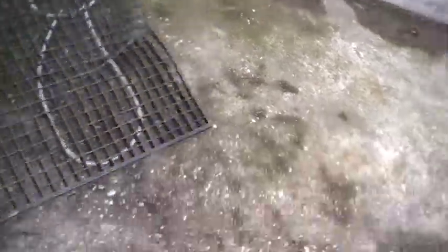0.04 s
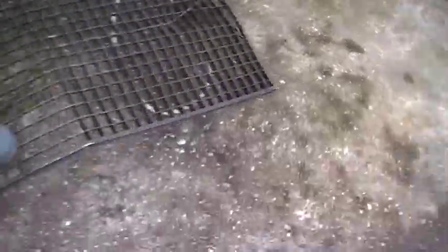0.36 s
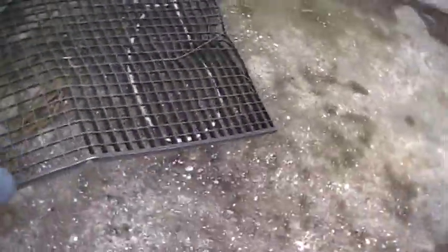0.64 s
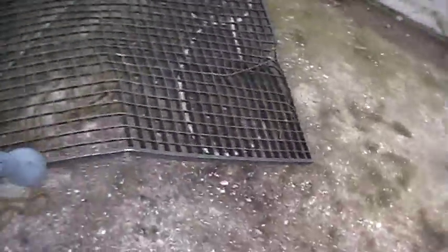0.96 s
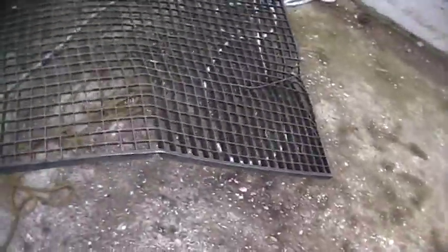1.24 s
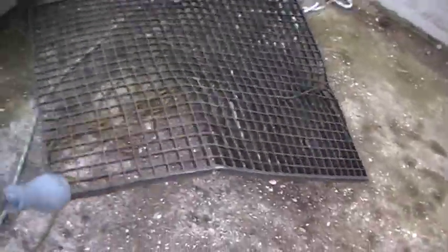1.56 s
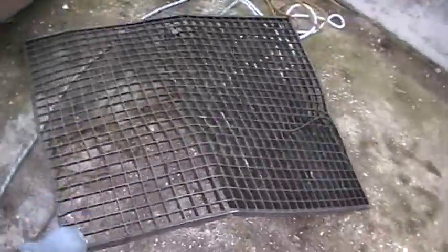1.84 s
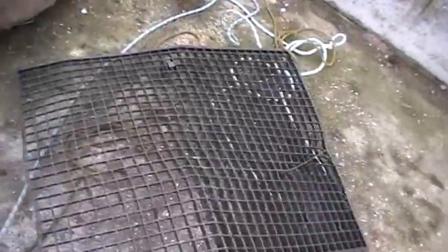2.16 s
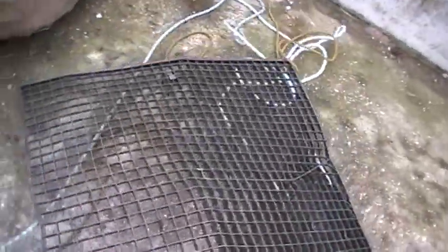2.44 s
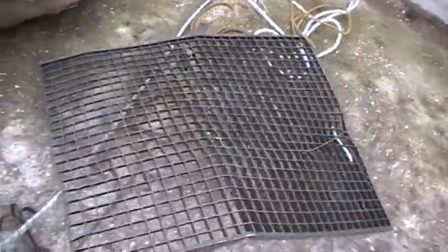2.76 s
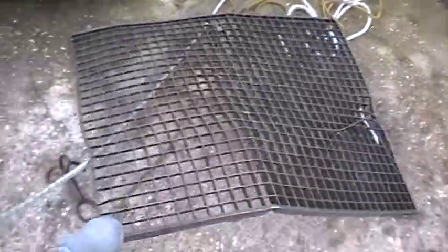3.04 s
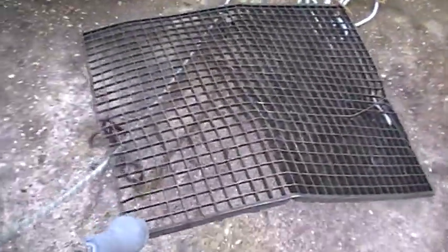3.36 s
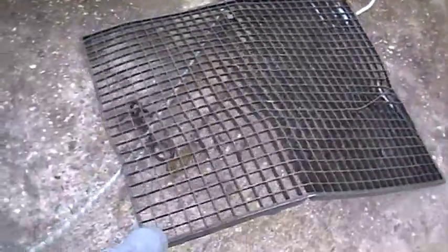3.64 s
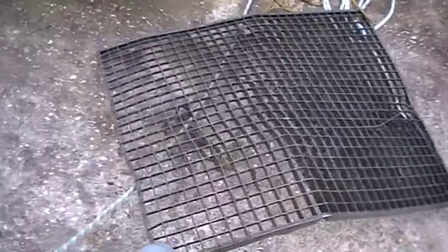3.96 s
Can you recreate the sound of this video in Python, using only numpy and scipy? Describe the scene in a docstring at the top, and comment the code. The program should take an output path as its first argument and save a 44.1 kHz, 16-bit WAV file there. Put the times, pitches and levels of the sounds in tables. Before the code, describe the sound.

A steel grid and chain scrape over rough concrete outdoors. After a brief jingle, the first gritty pull starts around 0.4 seconds, rings a bar at 1.2 and stops with a dull microphone thump at 1.4. A second pull runs from 1.6 to 4 seconds, the links clattering more densely from 2.8, with sharp clicks and small pings. Wind gusts rumble on the microphone, strongest between 0.5 and 2 seconds.

```python
"""A steel grid and a chain with hooks are dragged over rough concrete outdoors, in two pulls.
Grit crunches under the sliding steel and plucks the mesh; links jingle, catch and clatter in short runs.
Now and then a struck hook, bar or wire rings, the rim knocks, or the bent grid sticks, slips and groans.
Behind it lies a faint bed of air; gusts buffet the microphone, and one dull thump hits it."""
import sys
import numpy as np
from scipy import signal
from scipy.fft import rfft, irfft
from scipy.io import wavfile
from scipy.ndimage import uniform_filter1d

SR = 44100
rng = np.random.default_rng(int(sys.argv[2]) if len(sys.argv) > 2 else 0)


def dump(signal):
    """Clip the signal to [-1, 1] and save it as 16-bit WAV at the path in sys.argv[1]."""
    limited = np.clip(np.atleast_2d(signal).T, -1, 1)
    pcm = np.round(limited * 32767).astype(np.int16)
    wavfile.write(sys.argv[1], SR, pcm)


N = 176400

# Table levels are relative: each layer sets its own gain on top.
# EQ of the still air: (frequency [Hz], level [dB])
AIR_EQ = [(28, 6), (140, -2.5), (620, -7), (2100, -25), (10500, -19), (15500, -20)]
# EQ of the wind's low body: (frequency [Hz], level [dB])
RUMBLE_EQ = [(22, -48), (42, -4), (72, -5.5), (115, 1.5), (205, .5), (310, -7.5), (510, -20.5), (950, -24),
             (2900, -68)]
# EQ of the rasp in strong gusts: (frequency [Hz], level [dB])
RASP_EQ = [(40, -32), (190, -6), (320, 2.5), (470, 0), (760, -11), (1350, -22), (2450, -36), (6100, -82)]
# gust envelope: (time [s], level [dB])
GUSTS = [(0.0, -54), (0.11, -55), (0.22, -33.5), (0.41, -35.5), (0.43, -57), (0.5, -23.5), (0.58, -35),
         (0.63, -26.5), (0.71, -20.5), (0.92, -46), (0.97, -17), (1.02, -24), (1.06, -17), (1.1, -20.5),
         (1.15, -31), (1.24, -20.5), (1.28, -31.5), (1.37, -24.5), (1.4, -30.5), (1.44, -21), (1.48, -27.5),
         (1.56, -39.5), (1.64, -23), (1.68, -38), (1.7, -24.5), (1.77, -17), (1.82, -25.5), (1.84, -16.5),
         (1.94, -47.5), (2.08, -33.5), (2.12, -20), (2.16, -33.5), (2.41, -43.5), (2.43, -31.5),
         (2.47, -41.5), (2.65, -28), (3.04, -31), (3.11, -40.5), (3.15, -28), (3.19, -37), (3.3, -36.5),
         (3.32, -27.5), (3.45, -33.5), (3.51, -27.5), (3.62, -60), (3.65, -30.5), (3.73, -30), (3.77, -24),
         (3.83, -42.5), (3.89, -40), (3.92, -37), (3.97, -27.5), (4.0, -42)]
# short dull buffets on the microphone: (time [s], level [dB])
WIND_BUFFETS = [(0.334, -30), (0.615, -15.5), (0.753, -14), (0.816, -20.5), (1.052, -7.5), (1.071, -6),
                (1.84, -29), (2.655, -15), (2.692, -25), (2.755, -17), (2.798, -20), (2.844, -18),
                (2.887, -14), (3.019, -18), (3.146, -13.5), (3.327, -11.5), (3.507, -18), (3.654, -14),
                (3.923, -18.5)]

# blows on a hook: (time [s], level [dB])
HOOK_STRIKES = [(0.285, -33), (0.43, -21), (2.147, -29), (2.622, -24.5)]
# the hook's bright ring: (frequency [Hz], level [dB], t60 [s])
HOOK_MODES = [(7375, -3, 0.11), (9383, -12, 0.19), (9900, -12, .08), (10870, -14, 0.15), (12220, -6, 0.074),
              (13500, -9, 0.095)]
# blows on a bar of the grid: (time [s], level [dB])
BAR_STRIKES = [(1.2278, -26), (1.34, -40)]
# the bar's ring: (frequency [Hz], level [dB], t60 [s])
BAR_MODES = [(3060, -11.5, 0.5), (4730, -3.5, 0.45), (4640, 9, 0.029), (5440, 14, .028), (5920, 9, 0.032),
             (5940, -13, 0.34), (9369, 0, 0.18), (10400, -2, 0.12), (11030, 10.5, 0.045), (12200, -2.5, .1),
             (13528, -8.5, .11)]
# the grid's rim hits the concrete: (time [s], level [dB])
RIM_KNOCKS = [(0.412, -17.5), (2.323, -25), (2.803, -32)]
# the rim's short clank: (frequency [Hz], level [dB], t60 [s])
RIM_MODES = [(1500, -20, 0.035), (2060, -15, 0.034), (3030, 0, 0.021)]
# a wire slips: (time [s], level [dB])
CREAK_SLIPS = [(0.7, -20.5)]
# its short chirp: (frequency [Hz], level [dB], t60 [s])
CREAK_MODES = [(1070, 1, 0.023), (1360, -4.5, 0.022), (1780, -15, .022)]
# wires catch and sing: (time [s], frequency [Hz], level [dB])
WIRE_PLUCKS = [(0.153, 10900, -29), (0.775, 3910, -36), (1.345, 6640, -32), (1.745, 6160, -30),
               (1.75, 3040, -31)]
# wires snag and snap free: (time [s], level [dB])
WIRE_SNAPS = [(0.22, -10), (0.287, 2), (0.411, -4), (1.226, -8), (1.8423, 2), (1.9614, -4), (2.146, 12),
              (2.804, -2), (3.067, -1), (3.2039, 5), (3.498, 3), (3.5724, 0), (3.6214, -7)]
# the bent grid groans: (time [s], length [s], slip rate [1/s], level [dB])
GRID_GROANS = [(0.71, 0.031, 208, -23), (1.752, 0.041, 195, -21), (2.107, 0.029, 134, -20)]
# EQ of the grid's broad body: (frequency [Hz], level [dB])
BODY_EQ = [(60, -20), (135, -6), (230, 1), (450, -8.5), (700, -21.5), (1300, -24), (3000, -75)]
# its hollow resonance: (frequency [Hz], width [Hz], level [dB])
BODY_PEAKS = [(412, 80, 0)]

# EQ of the small links: (frequency [Hz], level [dB])
LINK_EQ = [(1000, -52), (2500, -11.5), (4200, -13), (6000, -10), (7400, -7), (8700, -4.5), (10100, 1.5),
           (11400, -1), (12700, -4), (14100, -11.5), (15900, -17)]
# their resonances: (frequency [Hz], width [Hz], level [dB])
LINK_PEAKS = [(6610, 190, -2), (7310, 156, 5), (8440, 120, -2.5), (9130, 160, -5), (10500, 50, -23),
              (12400, 87, -7)]
# a link clicks hard on its neighbour: (time [s], level [dB])
LINK_TICKS = [(0.0065, 1), (0.0138, 3), (0.024, -12), (0.036, -2), (0.0497, -11), (3.256, -2)]
# links catch and clatter: (time [s], level [dB], grit send [dB], length [s])
CLATTER_RUNS = [(0.0014, -14, -37, 0.032), (0.0264, -20.5, -40, 0.035), (0.2195, -22, -32, 0.007),
                (0.2583, -24, -24, 0.017), (0.2864, -16, -22, 0.005), (0.41, -22.5, -6, 0.0047),
                (0.432, -15, -35, 0.0063), (0.503, -21.5, -8, 0.0055), (0.523, -16.5, -28, 0.0048),
                (0.591, -12, -11, 0.0055), (0.7586, -22, -20, 0.0064), (0.781, -19, -31, 0.01),
                (0.855, -16.5, -5.5, 0.01), (0.8976, -21.5, -0.5, 0.0056), (1.083, -13, 2.5, 0.0063),
                (1.1144, -10, -17, 0.0042), (1.1964, -21, 1, 0.0055), (1.208, -11, 0, 0.0026),
                (1.228, -5.5, -22, 0.0061), (1.295, -19, -26, 0.0039), (1.3364, -15.5, -38, 0.022),
                (1.407, -11.5, -12, 0.0044), (1.574, -18, -16, 0.0055), (1.602, -12.5, -27, 0.007),
                (1.662, -18, -16, 0.0062), (1.6905, -15.5, -24, 0.0082), (1.718, -12, -26, 0.005),
                (1.7479, -17, -26, 0.0055), (1.7722, -9.5, -2.5, 0.0086), (1.8421, -2.5, -11.5, 0.0031),
                (1.96, -5.5, -13.5, 0.0045), (2.0283, -10.5, -6.5, 0.0073), (2.0636, -15.5, -31, 0.0059),
                (2.0847, -16.5, -2.5, 0.015), (2.143, -2.5, -12, 0.0027), (2.2348, -17.5, -15, 0.0063),
                (2.258, -16, -27, 0.0025), (2.302, -13.5, -20, 0.0063), (2.3224, -13, -3, 0.0054),
                (2.384, -17.5, -0.5, 0.005), (2.4015, -11.5, -14, 0.0042), (2.4353, -10.5, -5.5, 0.0093),
                (2.454, -14, -21, 0.0062), (2.4961, -8.5, -6, 0.0087), (2.575, -18.5, -3, 0.032),
                (2.622, -13, -7, 0.0042), (2.659, -11.5, -11, 0.011), (2.675, -15.5, -1.5, 0.011),
                (2.709, -12.5, -9, 0.013), (2.7777, -7, -11, 0.0044), (2.801, 0.5, -5, 0.0034),
                (2.8836, -9.5, -6, 0.0055), (2.903, -11, -3, 0.0055), (2.9472, -6.5, -16, 0.006),
                (2.9668, -5.5, -8.5, 0.01), (3.001, -12.5, -2.5, 0.006), (3.0445, -9, -8, 0.0049),
                (3.0683, -3, -4.5, 0.0093), (3.087, -7.5, -4, 0.015), (3.1194, -8, -26, 0.0084),
                (3.1414, -7.5, -6, 0.015), (3.1652, -2.5, -8, 0.005), (3.2043, -1, -18, 0.0059),
                (3.2547, -5.5, -26, 0.0029), (3.282, -3, -45, 0.0036), (3.3024, -20, -17, 0.0051),
                (3.3344, -8, -2, 0.0042), (3.364, -7.5, -33, 0.013), (3.3793, -7.5, -6, 0.015),
                (3.424, -5, -4.5, 0.0068), (3.465, -5, -12, 0.0074), (3.4975, -6.5, -7.5, 0.0084),
                (3.5124, -6, -5.5, 0.0045), (3.526, -6, -17, 0.0078), (3.535, -11, -15, 0.0091),
                (3.57, -7, -16, 0.0053), (3.62, -14.5, -12, 0.006), (3.6411, -16.5, -11, 0.016),
                (3.676, -13.5, -14, 0.0097), (3.7225, -6.5, -32, 0.0065), (3.747, -6.5, -9, 0.0042),
                (3.7808, -4, -35, 0.0064), (3.8615, -5, -31, 0.0061), (3.8814, -9, -25, 0.007),
                (3.934, -9, -34, 0.0099), (3.9677, -5.5, -22, 0.0041), (3.981, -6, -16, 0.0072)]
# EQ of concrete under steel: (frequency [Hz], level [dB])
GRIT_EQ = [(35, -33), (160, -13.5), (420, -12), (720, -2.5), (1100, -2.5), (1650, -3), (2350, -2.5),
           (3300, -3), (4600, -6), (6600, -9.5), (10100, -3.5), (15900, -36)]
# resonances of the sliding steel: (frequency [Hz], width [Hz], level [dB])
STEEL_PEAKS = [(930, 49, -15.5), (1148, 81, -8), (1750, 160, -10), (2190, 130, -10)]
# scrape envelope while the grid settles: (time [s], level [dB])
DRAG_SETTLE = [(0.0, -37.5), (0.132, -51), (0.21, -52), (0.246, -47.5), (0.37, -47.5), (0.385, -63),
               (0.407, -58)]
# the first pull, from a jerk to a dead stop: (time [s], level [dB])
DRAG_FIRST = [(0.414, -28.5), (0.483, -53.5), (0.503, -33.5), (0.557, -37), (0.591, -27.5), (0.683, -43),
              (0.703, -35), (0.711, -39), (0.831, -46), (0.935, -42.5), (0.985, -30.5), (1.095, -27),
              (1.173, -35), (1.227, -28), (1.259, -37), (1.428, -32)]
# the second, longer pull: (time [s], level [dB])
DRAG_SECOND = [(1.45, -67), (1.48, -54), (1.55, -54), (1.6, -34.5), (1.8, -34), (1.94, -46.5), (1.97, -43),
               (1.99, -44.5), (2.14, -31), (2.21, -51), (2.22, -37.5), (2.3, -44), (2.329, -33),
               (2.35, -41), (2.51, -37), (2.53, -39), (2.8, -34.5), (2.8, -25), (2.85, -41.5), (2.91, -29),
               (2.93, -35.5), (3.07, -27), (3.52, -29), (3.59, -39), (3.69, -31.5), (3.71, -37),
               (3.73, -27.5), (3.84, -33), (3.88, -24.5), (4.0, -28)]

TIME = np.arange(N) / SR
STOP_S = 1.435   # the first pull stops dead; the thump lands on the same cue


def from_db(db):
    """Decibels to gain."""
    return 10 ** (np.asarray(db) / 20)


def rms_one(x):
    """Scale to rms 1."""
    return x / np.sqrt(np.mean(x ** 2) + 1e-20)


def envelope(rows):
    """Join (time, level) breakpoints with straight lines."""
    return np.interp(TIME, *np.transpose(rows))


def decay(age, fall_s):
    """Full level until age 0, then an exponential fade."""
    return np.exp(-np.clip(age / fall_s, 0, 50))


def drift(rate_hz):
    """A smooth random wobble of rms about 1."""
    hop, warm_up = 40, 2000
    pole = np.exp(-2 * np.pi * hop * rate_hz / SR)
    noise = rng.standard_normal(N // hop + warm_up + 2)
    slow = signal.lfilter([1], [1, -2 * pole, pole * pole], noise)[warm_up:]
    return np.interp(np.arange(N) / hop, np.arange(len(slow)), rms_one(slow))


def colour(x, eq, peaks=()):
    """Causal filter of unit power: a broad EQ curve with resonant peaks on top."""
    size = 2 * N
    hz = np.arange(N + 1) * SR / size
    eq_hz, eq_db = np.transpose(eq)
    curve_db = np.interp(np.log(hz + 1), np.log(eq_hz), eq_db)
    cepstrum = irfft(np.log(from_db(curve_db)))
    response = np.exp(rfft(np.r_[0, 2 * cepstrum[1:N]], size))   # minimum phase: no pre-ring
    response *= 1 + sum(from_db(db) / (1 + 2j * (hz - centre) / width) for centre, width, db in peaks)
    response /= np.sqrt(np.mean(abs(response) ** 2))
    return irfft(rfft(x, size) * response)[:N]


def grains(per_s, spread_db=0.5):
    """Random tiny impacts of uneven size; rms 1."""
    sizes = from_db(spread_db * np.minimum(rng.exponential(1, N), 4))
    signs = rng.choice([-1, 1], N)
    return rms_one(sizes * signs * (rng.random(N) < per_s / SR))


def levelled(x, window):
    """Ride out chance swings of level over a window of samples."""
    power = np.maximum(uniform_filter1d(x * x, window), 0)
    return x / np.sqrt(power + 0.02)


def impulses(times, db):
    """One-sample clicks on cue."""
    clicks = np.zeros(N)
    clicks[(np.asarray(times) * SR).astype(int)] = from_db(db)
    return clicks


def ring(clicks, hz, t60):
    """Each click sets a damped sine ringing."""
    radius, angle = from_db(-60 / (t60 * SR)), 2 * np.pi * hz / SR
    return signal.lfilter([0, np.sin(angle)], [1, -2 * radius * np.cos(angle), radius ** 2], clicks + 1e-18)


def struck(hits, modes):
    """Each blow excites every mode with a slightly random strength."""
    times, hit_db = np.transpose(hits)
    out = np.zeros(N)
    for hz, mode_db, t60 in modes:
        scatter_db = 2 * rng.standard_normal(len(times))
        out += ring(impulses(times, hit_db + mode_db + scatter_db), hz, t60)
    return out


def pings(level, eq, per_s, range_hz, t60, parts=36):
    """Random touches ring small parts, each at its own pitch, as loud as the level that drives them."""
    touches = grains(per_s, spread_db=2) * level
    pitches = np.linspace(*range_hz, parts) + 50 * rng.standard_normal(parts)
    touched = rng.integers(0, parts, N)
    rings = sum(ring(touches * (touched == k), hz, t60) for k, hz in enumerate(pitches))
    return np.sqrt(np.mean(level ** 2)) * rms_one(colour(rings, eq))


def air(gain_db=-49.5):
    """Still air: a faint, steady bed of dark noise."""
    return from_db(gain_db) * colour(rng.standard_normal(N), AIR_EQ)


def wind(rumble_db=-1.54, buffet_db=-4, rise_s=0.0024, rasp_db=-25, strong_gust_db=-18.5):
    """Eddies on the microphone: a fluttering rumble with short buffets, and a rasp in strong gusts."""
    gust_db = envelope(GUSTS) + 3 * drift(rate_hz=62)
    power = from_db(rumble_db + gust_db) ** 2
    for start, db in WIND_BUFFETS:
        rise = np.clip((TIME - start) / rise_s, 0, 50)
        power += (from_db(buffet_db + db) * rise * np.exp(1 - rise)) ** 2
    rumble = levelled(colour(rng.standard_normal(N), RUMBLE_EQ), window=600)
    rasp = levelled(colour(rng.standard_normal(N), RASP_EQ), window=500)
    rasp_gain = from_db(rasp_db + 1.49 * (gust_db - strong_gust_db))   # swells faster than the rumble
    return rumble * np.sqrt(power) + rasp * rasp_gain


def thump():
    """One dull, heavily damped push on the microphone."""
    return ring(impulses([STOP_S], db=3), hz=150, t60=0.013)


def creak():
    """A wire slips with one short chirp."""
    return struck(CREAK_SLIPS, CREAK_MODES)


def rim():
    """The rim of the grid knocks on the concrete and clanks."""
    return struck(RIM_KNOCKS, RIM_MODES)


def bar(choke_s=0.0091):
    """A struck bar sings until the grid's dead stop chokes it."""
    return struck(BAR_STRIKES, BAR_MODES) * decay(TIME - STOP_S, choke_s)


def hook():
    """A struck hook rings high and bright."""
    return struck(HOOK_STRIKES, HOOK_MODES)


def wires(t60=0.078):
    """Each plucked wire sings at a pitch of its own."""
    return sum(struck([(start, db)], [(hz, 0, t60)]) for start, hz, db in WIRE_PLUCKS)


def groans():
    """Short runs of stick and slip drive the hollow body of the bent grid."""
    pulses = np.zeros(N)
    for start, length, per_s, db in GRID_GROANS:
        age = TIME - start
        slips = np.diff(np.floor(age * per_s), prepend=0) > 0
        swell = np.sqrt(np.abs(np.sin(np.pi * np.clip(age / length, 0, 1))))
        strength = from_db(db + rng.standard_normal(N)) * np.sqrt(SR / per_s)
        pulses += slips * swell * strength
    return colour(pulses, BODY_EQ, BODY_PEAKS)


def snaps(gain_db=-19.5, fall_s=0.0014):
    """Snagged wires snap free: hard cracks a few milliseconds long."""
    level = np.zeros(N)
    for start, db in WIRE_SNAPS:
        age = TIME - start
        level += from_db(gain_db + db) * (age >= 0) * decay(age, fall_s)
    return colour(level * rng.standard_normal(N), LINK_EQ)


def ticks():
    """Hard single clicks of link against link."""
    times, db = np.transpose(LINK_TICKS)
    return colour(impulses(times, db), LINK_EQ)


def crackle(motion, gain_db=-6):
    """Sparse, sharp clicks that grow with the motion of the links."""
    return colour(from_db(gain_db) * motion * grains(per_s=230, spread_db=3), LINK_EQ)


def link_pings(shaking):
    """The harder the chain is shaken, the louder its single links ring."""
    return pings(shaking, LINK_EQ, per_s=250, range_hz=(7050, 14150), t60=0.03)


def clatters(metal_db=-12, grit_db=-11, ping_db=-9, attack_s=0.00071, tail_db=-32):
    """The chain catches: runs of tiny touches shake the links and crush grit, then die away."""
    metal_power, grit_power = np.zeros((2, N))
    for start, db, send_db, length in CLATTER_RUNS:
        age = TIME - start
        attack = np.clip(age / attack_s, 0, 1)
        release = decay(age - length, fall_s=0.0071)
        tail = from_db(tail_db) * decay(age - length, fall_s=0.029)
        power = (from_db(db) * attack * (release + tail)) ** 2
        metal_power += power
        grit_power += power * from_db(send_db) ** 2
    touches = levelled(grains(per_s=6500), window=200)
    shaking = from_db(metal_db) * np.sqrt(metal_power)
    rattle = colour(touches * shaking, LINK_EQ, LINK_PEAKS)
    grit = from_db(grit_db) * colour(touches * np.sqrt(grit_power), GRIT_EQ, STEEL_PEAKS)
    return rattle + from_db(ping_db) * link_pings(shaking) + crackle(shaking) + grit


def scrape(crunch_db=-0.23, mesh_db=-7.23, jingle_db=-2, ping_db=-5, judder_db=2):
    """Steel judders over grit, which plucks the mesh, and the sliding links jingle along."""
    drag = from_db(envelope(np.vstack([DRAG_SETTLE, DRAG_FIRST, DRAG_SECOND])))
    judder = from_db(judder_db * drift(rate_hz=45))
    grit = grains(per_s=3000) * from_db(crunch_db) * drag * judder
    crunch = colour(grit, GRIT_EQ, STEEL_PEAKS)
    mesh = pings(from_db(mesh_db) * drag, GRIT_EQ, per_s=200, range_hz=(1050, 6422), t60=0.05)
    sliding = from_db(jingle_db) * drag
    jingle = colour(grains(per_s=1300) * sliding * judder, LINK_EQ, LINK_PEAKS)
    return crunch + mesh + jingle + crackle(sliding) + link_pings(from_db(ping_db) * sliding)


def scene():
    """Mono mix: dragged metal and its ringing accents over air and wind."""
    metal = scrape() + clatters() + snaps() + ticks() + groans() + wires()
    accents = hook() + bar() + rim() + creak()
    background = air() + wind() + thump()
    return (metal + accents + background)[None]


def record(dry, low_cut_hz=92, high_cut_hz=15800, ceiling=1.5):
    """Master chain: low cut, soft clip to round the peaks, steep high cut."""
    low_cut = signal.butter(2, low_cut_hz, "high", fs=SR, output="sos")
    high_cut = signal.cheby1(14, 0.2, high_cut_hz, fs=SR, output="sos")
    rounded = ceiling * np.tanh(signal.sosfilt(low_cut, dry) / ceiling)
    return signal.sosfilt(high_cut, rounded)


dry = scene()
out = record(dry)
dump(out)
```